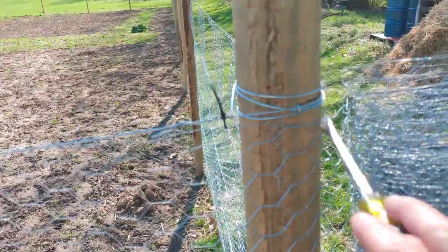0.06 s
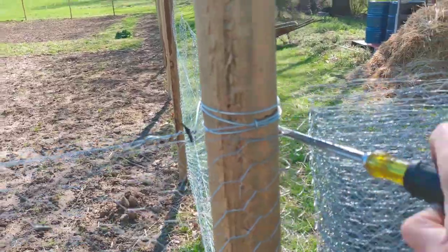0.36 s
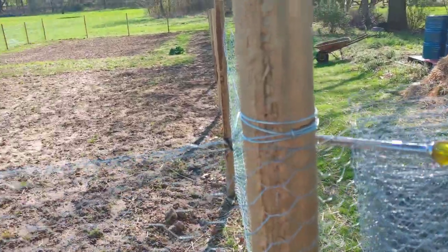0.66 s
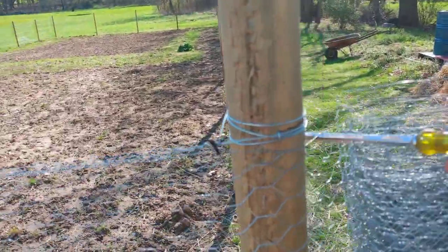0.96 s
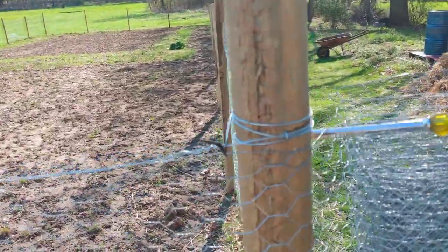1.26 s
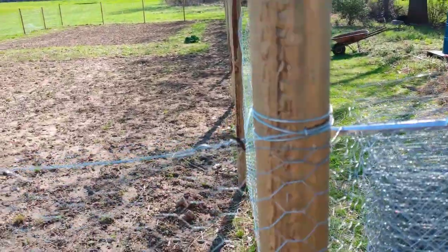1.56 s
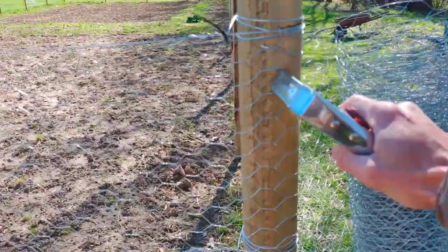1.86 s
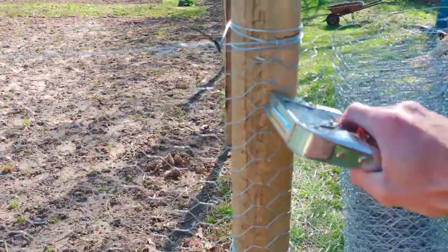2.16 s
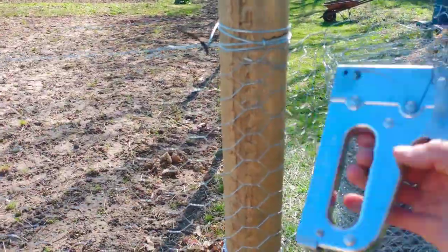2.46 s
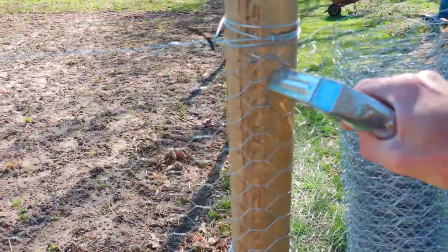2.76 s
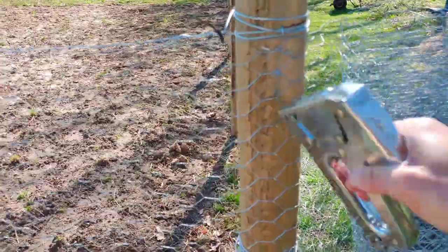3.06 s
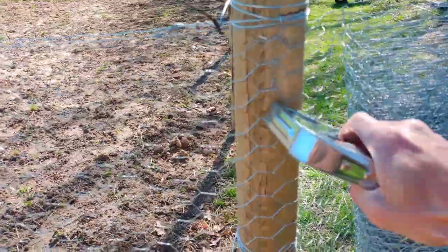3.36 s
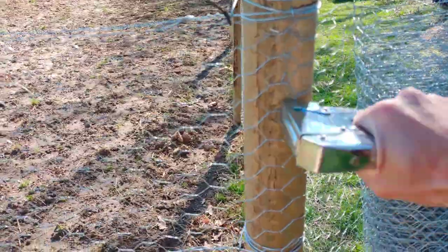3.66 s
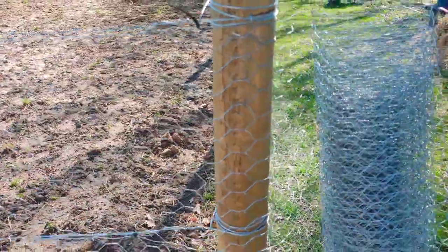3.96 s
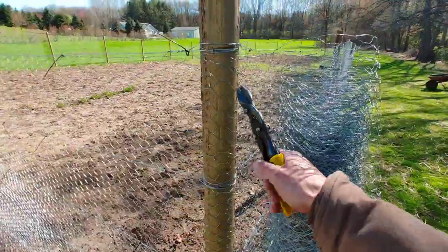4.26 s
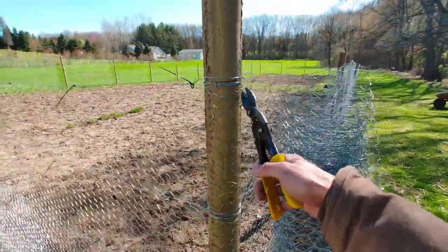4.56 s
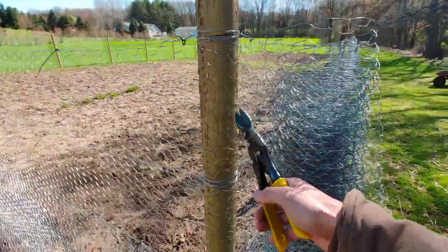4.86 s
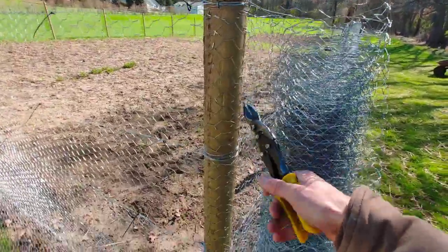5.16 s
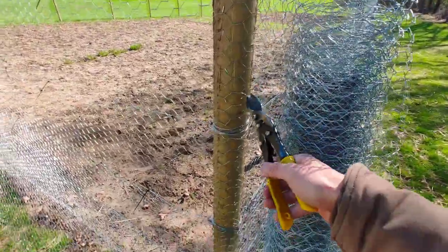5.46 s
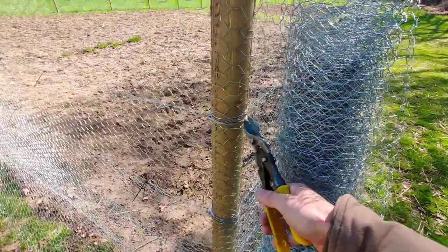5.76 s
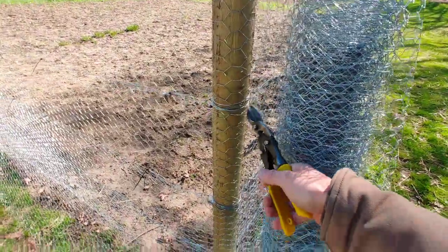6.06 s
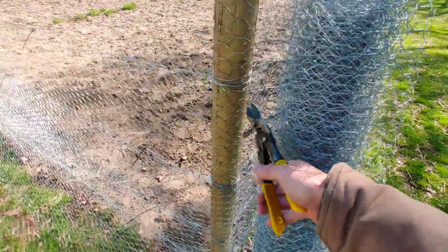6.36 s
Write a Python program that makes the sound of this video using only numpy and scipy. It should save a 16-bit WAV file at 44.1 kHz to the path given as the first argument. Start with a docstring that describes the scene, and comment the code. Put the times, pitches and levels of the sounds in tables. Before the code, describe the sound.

Wire mesh is fixed to a post outdoors, with the tools close to the microphone. For the first two seconds, uneven wind buffets the microphone with low rumbles and bumps, while wire ticks and scrapes lightly as it is twisted, with a sharper click at about 1.6 seconds. Small birds chirp faintly behind, growing sparser later. A staple gun fires with short metallic snaps at about 2.4, 3.0 and 3.8 seconds, with lighter handle clacks around them. The wind mostly dies down after 3 seconds. From about 4.2 seconds, soft mesh rustling and tiny steel squeaks lead into hand snips cutting wire: about eight sharp, briefly ringing clicks at uneven intervals, loudest near 5.2, 5.4 and 6.5 seconds, with light wire ticks between them. One more low wind bump comes near 5.3 seconds. A very faint breeze continues underneath.

```python
"""Fencing a garden with wire mesh.

Tie wire is twisted round a post, a staple gun fires three times and is shifted about, then tin snips
bite through the mesh. Each contact is a metallic click, smeared into a short, symmetrical burst of
ringing noise. Wind buffets two microphones; small birds chirp over the faint air of the field."""
import sys
import numpy as np
from scipy import signal
from scipy.fft import rfft, irfft, next_fast_len
from scipy.io import wavfile
from scipy.ndimage import uniform_filter1d

SR = 44100
rng = np.random.default_rng(int(sys.argv[2]) if len(sys.argv) > 2 else 0)


def log_audio(samples):
    """Write samples as a 16-bit WAV file to the path given in sys.argv[1]."""
    # one column per channel
    frames = np.atleast_2d(samples).T
    # limit to full scale, then quantise
    limited = np.clip(frames, -1, 1)
    pcm = np.round(limited * 32767).astype(np.int16)
    wavfile.write(sys.argv[1], SR, pcm)


N = 287487
TIME_S = np.arange(N) / SR

# Wire on post and tools. Each row: centre in seconds, level in dB, body, brightness and sizzle in dB
# relative to that level, strongest ring in Hz.
WIRE_TICKS = [(0.3074, -53.5, -18, -4.5, -21, 3800), (0.585, -46.5, 0, 2, -2, 4080),
              (0.736, -41.5, -10, -2, -12.5, 1420), (0.8983, -65.5, -11, 7.5, -28, 6000),
              (0.9787, -64, -8.5, 5, -23, 5520), (1.201, -64.5, 6, 10, -0.5, 6120),
              (1.314, -51, 10.5, -27, -31, 1260), (1.631, -31, -6.5, -2.5, -7, 3810),
              (1.9134, -52.5, 3, -8, -9, 1320), (1.9982, -42, -19, -10, -11, 2390),
              (4.171, -53.5, -9, -0.5, -4.5, 2920), (4.9737, -63, -4, 10, 6, 6100),
              (5.8972, -47.5, -5.5, -3, -8, 3560), (5.9294, -47.5, -17, -2, -3.5, 3540),
              (6.2693, -52, -16.5, -3, -8, 3860)]
# Staple shots. Each row: centre and half-width in seconds, level in dB, relative sizzle in dB.
STAPLE_SHOTS = [(2.3678, 0.0063, -23, -2.5), (3.0055, .0078, -29.5, -1.5), (3.7677, 0.0074, -26.5, -2)]
# Handle and nose clacks. Each row: centre in seconds, level in dB, relative brightness in dB, ring in Hz.
STAPLER_CLACKS = [(2.35, -40.5, -8, 2250), (2.594, -34.5, -1, 1290), (2.6287, -46.5, 0.5, 1180),
                  (2.667, -54.5, -3.5, 2170), (2.9045, -49.5, -6.5, 2330), (2.9641, -42.5, -9.5, 3050),
                  (3.0614, -54.5, 1, 4400), (3.121, -36.5, -0.5, 2014), (3.179, -50.5, -0.5, 2000),
                  (3.7047, -53, -14, 2220), (3.823, -50, -13.5, 4070), (3.8437, -38.5, 0, 2030)]
# Strands cut. Each row: as WIRE_TICKS, then relative ring height in dB.
SNIP_CUTS = [(4.4181, -41.5, -14.5, -7.5, -7.5, 1440, 4), (4.5864, -46, -21.5, -4.5, -7, 1610, 6),
             (4.8776, -29.5, -25, -11, -5.5, 2070, 9), (5.1861, -22.5, -16, -8.5, -7, 2300, 5.3),
             (5.4021, -24.5, -22.5, -3.5, -9.5, 2880, 9.5), (5.5953, -32, -12.5, -8, -11, 3160, 12.9),
             (6.0623, -35.5, -9.5, -6, -3.5, 1750, 4.8), (6.4888, -24, -15, -7.5, -9, 1990, 7)]
# Light, ringing wire ticks between and just after the snips. Each row: as STAPLER_CLACKS.
RINGING_TICKS = [(4.6177, -73, 7, 6080), (4.912, -58, -0.5, 4100), (5.3519, -58.5, -12.5, 3470),
                 (5.445, -49.5, 1, 3700), (5.627, -59, 4, 5600), (5.754, -61.5, -7, 3660),
                 (5.7777, -68.5, 0.5, 2900), (6.09, -59, -8, 3340)]
# Steel modes. Each row: frequency in Hz, width in Hz, height over the broad response in dB.
WIRE_MODES = [(880, 16, 13.5), (1422, 41, 7.5), (1766, 66, 2.5), (3030, 400, -12.5), (5500, 330, 4),
              (6440, 310, 1.5)]
STAPLER_MODES = [(826, 58, 4.4), (1114, 63, 9.9), (1827, 120, 6.8), (2034, 80, 7), (2740, 46, 3.8),
                 (3360, 82, 5), (4132, 200, 9.3), (5160, 110, 6.4), (5700, 120, 6.9), (6700, 99, 6.9),
                 (7920, 21, 5.2), (9300, 150, 4.9), (10400, 130, 2), (11650, 220, 3.1)]
SNIP_MODES = [(1473, 44, 10.9), (1717, 91, 3.7), (2265, 28, 2.2), (2150, 47, 1.7), (3103, 260, 1.4),
              (3970, 58, 2.2), (5290, 330, 2.7), (6250, 200, 2), (9140, 150, 5.6), (11700, 150, 2),
              (13300, 120, 4.16)]
# Steel slipping on steel. Each row: centre and half-width in seconds, pitch in Hz, level in dB.
SQUEAKS = [(0.421, 0.0072, 5750, -59), (2.43, 0.0064, 3484, -39), (2.454, .0036, 1480, -53),
           (2.762, 0.0041, 4420, -57.5), (4.208, 0.0075, 3050, -49.5), (4.218, 0.0074, 2694, -47.5),
           (4.333, 0.011, 2605, -55), (5.338, 0.0076, 2490, -60.5), (5.348, 0.0048, 3380, -49),
           (5.445, 0.0035, 3500, -42), (5.669, 0.0074, 3540, -58.5), (5.812, 0.0055, 4120, -53),
           (6.398, 0.0058, 3800, -61)]
# Mesh sliding on wood and tools. Each row: centre and half-width in seconds, level in dB.
SCRAPES = [(0.213, 0.032, -59.5), (0.87, 0.01, -66), (1.062, .008, -68), (1.236, 0.037, -65),
           (1.404, 0.016, -61), (2.205, 0.02, -67), (2.448, 0.0066, -62.5), (2.485, 0.0046, -71.5),
           (2.762, 0.0057, -67.5), (4.113, 0.0028, -64), (4.185, 0.03, -66), (4.376, 0.034, -66.5),
           (4.551, 0.011, -75), (6.455, 0.017, -72.5)]
# Shading between the microphones. Each row: frequency in Hz, left minus right in dB.
MIC_SHADING = [(400, 5), (900, 2.5), (1400, 6.5), (1900, -2), (2500, 3.5), (3100, 0), (3500, -1),
               (4300, -3), (5400, -9.5), (6400, -4.5), (7500, 6), (10000, 2.5), (14000, 7)]
# Wind pressure per microphone. Each row: time in seconds, relative level in dB.
WIND_LEFT = [(0.09, -99), (0.14, -39), (0.39, -44), (0.45, -28.5), (0.56, -35.5), (0.73, -27), (1.0, -22.5),
             (1.32, -28), (1.67, -20.5), (1.88, -35), (1.98, -59), (2.05, -48), (2.35, -53.5),
             (2.44, -70.5), (2.49, -36), (2.65, -43), (2.9, -32.5), (3.06, -63), (3.7, -67), (3.85, -74.5)]
WIND_RIGHT = [(0.04, -70), (0.14, -46.5), (0.3, -47.5), (0.4, -59), (0.73, -33.5), (0.84, -44.5),
              (0.98, -25.5), (1.09, -46), (1.381, -26), (1.519, -43), (1.661, -30.5), (2.1, -52),
              (2.33, -39), (2.441, -66.5), (2.56, -42.5), (2.719, -54.5), (2.971, -34), (3.05, -54.5),
              (3.5, -69), (3.851, -79)]
# Lone eddies. Each row: centre and half-width in seconds, level and left minus right in dB, pitch in Hz.
PUFFS = [(0.259, 0.0044, -29.5, 14, 272), (0.617, 0.0047, -20, 31, 205), (0.744, .012, -18, 12, 148.4),
         (0.834, 0.0052, -17, 34, 155), (0.889, 0.0042, -14, 24, 198), (0.968, 0.0048, -17, 9.5, 278),
         (1.04, 0.0044, -28, 22, 363), (1.247, 0.0098, -20, 19, 245), (1.657, 0.023, -25, 25, 299),
         (1.902, 0.01, -24.5, 14, 148), (1.988, 0.0078, -26.5, -36, 138.5), (2.312, 0.013, -20, -45, 167),
         (2.9, 0.018, -28, 11, 134), (3.098, 0.0062, -34.5, -31, 124), (3.268, 0.0068, -34.5, -21, 128),
         (3.662, 0.047, -58, 8, 209), (4.26, 0.041, -59, 10, 109), (4.4, 0.0043, -49.5, 15, 137),
         (5.298, 0.0071, -29.5, 41, 208), (5.396, 0.01, -49, 8, 172)]
# Raspy and clear bird notes. Each row: centre and length in seconds, mid-note pitch in Hz, level in dB.
CHIRPS = [(0.04, 0.06, 3090, -65.5), (0.335, 0.052, 4100, -56.5), (0.445, 0.04, 3930, -50.5),
          (0.762, 0.039, 4100, -52), (1.026, 0.039, 4120, -56.5), (1.084, 0.042, 3730, -61),
          (1.282, .1, 2810, -68.5), (1.415, 0.044, 4140, -48), (1.847, 0.037, 4080, -52.5),
          (2.039, 0.033, 2560, -54), (2.09, 0.04, 2840, -53.5), (2.215, 0.045, 2624, -55),
          (3.342, 0.059, 2570, -71.5), (3.487, 0.04, 2840, -64.5), (3.661, 0.031, 2590, -56)]
WHISTLES = [(0.1, .027, 2560, -65), (1.468, 0.085, 2710, -62), (1.692, .039, 2875, -52),
            (2.235, .04, 2350, -55), (3.368, .043, 2360, -72), (3.529, 0.04, 2975, -63),
            (3.69, 0.084, 2355, -62), (4.454, 0.025, 2545, -65.5), (5.085, .022, 2380, -66),
            (5.11, 0.022, 2790, -68.5), (6.205, .03, 2650, -73)]
# Air of the field. Each row: time in seconds, relative mid and treble levels in dB.
AIR_LEVELS = [(0.0, -78, -85.5), (0.4, -73, -78), (0.56, -75, -79), (0.91, -75.5, -86.5), (1.69, -75, -84),
              (2.27, -72, -80), (2.7, -82, -86), (3.1, -80, -92.5), (3.43, -80, -87), (4.34, -79.5, -87),
              (4.65, -84.5, -83.5), (5.77, -79.5, -83.5), (6.21, -83, -84.5), (6.52, -84.5, -79)]
# Brief level dips. Each row: centre and half-width in seconds.
DIPS = [(1.941, 0.013), (4.147, 0.016)]
# Source spectra. Each row: frequency in Hz, relative gain in dB.
STEEL_EQ = [(60, -13), (200, -7.5), (450, -0.5), (700, -5), (1100, -3.5), (1500, 0.5), (3200, 2.5),
            (4500, -2.5), (6700, -3), (7700, -7), (10500, -2.5), (16000, -9.5)]
SCRAPE_EQ = [(500, 7), (1500, 0.5), (3500, 0), (6700, -0.5), (7800, -20), (12000, -12.5), (16000, -11)]
RUSTLE_EQ = [(1500, -4.5), (3500, -1.5), (6700, 0), (7800, -12), (10000, -2), (13000, -1), (16000, -1)]
GENTLE_WIND_EQ = [(20, -19.5), (40, -15), (65, -4), (120, 5), (180, -1.5), (250, -9.5), (330, -26),
                  (450, -43), (700, -53.5), (2000, -84.5)]
HARD_WIND_EQ = [(100, -30.5), (220, -3), (300, 10.5), (380, -0.5), (460, -11), (580, -24), (750, -38.5),
                (1100, -39), (3000, -72.5)]
FAR_RUMBLE_EQ = [(20, 1), (80, 4.5), (130, 4.5), (280, 3), (450, -3), (800, -8.5), (1500, -38)]
TREES_EQ = [(400, -16.5), (800, 3.5), (1400, -4), (3000, -4.5), (4500, -10.5), (7000, -22.5)]
GRASS_EQ = [(2500, -5.5), (4500, 3.5), (6700, 4.5), (7800, -14.5), (10000, 3.5), (13000, 1), (16000, -7)]


def staple_gun(rebound_s, rebound_db):
    """A spring drives each staple home, the striker rebounds once, duller; handle and nose clack."""
    shots = [contact(s, half_s, db, body_db=-11, bright_db=-2, sizzle_db=sizzle_db,
                     ring_hz=2530, height_db=7, pan_db=-1)
             for s, half_s, db, sizzle_db in STAPLE_SHOTS]
    rebounds = [contact(s + rebound_s, half_s=0.0058, db=db + rebound_db, body_db=-22, bright_db=-2,
                        sizzle_db=-9, ring_hz=2530, height_db=7, pan_db=-1)
                for s, _, db, _ in STAPLE_SHOTS]
    clacks = [contact(s, half_s=0.0059, db=db, body_db=-27, bright_db=bright_db,
                      sizzle_db=bright_db - 1, ring_hz=hz, height_db=11, pan_db=-1)
              for s, db, bright_db, hz in STAPLER_CLACKS]
    return struck_steel(shots + rebounds + clacks, STAPLER_MODES, body_hz=1050, ring_trim_db=0.5,
                        ring_width_hz=280, tail_db=-18.5, tail_t60_s=0.09, grain_db=0.85)


def snips(cut_half_s, tick_half_s):
    """Blades bite through strands; light, ringing wire ticks fall between and just after cuts."""
    cuts = [contact(s, cut_half_s, *tone, pan_db=-2) for s, *tone in SNIP_CUTS]
    ticks = [contact(s, tick_half_s, db, body_db=-24, bright_db=bright_db,
                     sizzle_db=bright_db - 9, ring_hz=hz, height_db=21, pan_db=-2)
             for s, db, bright_db, hz in RINGING_TICKS]
    return struck_steel(cuts + ticks, SNIP_MODES, body_hz=1100, ring_trim_db=-1.5,
                        ring_width_hz=230, tail_db=-10, tail_t60_s=0.061, grain_db=2)


def wire(tick_half_s, stray_half_s, stray_count):
    """Wire slips on post and blades; loose strands touch at random, harder in livelier air."""
    ticks = [contact(s, tick_half_s, *tone, height_db=10.5, pan_db=-1.5) for s, *tone in WIRE_TICKS]
    for s, force, pitch in rng.random((stray_count, 3)) * [N / SR, 1, 1]:
        db = air_treble_db(s) + 3 + 7.5 * force
        ticks.append(contact(s, stray_half_s, db, body_db=-13, bright_db=-1, sizzle_db=-8,
                             ring_hz=2600 + 3000 * pitch, height_db=16, pan_db=-2))
    return struck_steel(ticks, WIRE_MODES, body_hz=1120, ring_trim_db=-1,
                        ring_width_hz=490, tail_db=-12, tail_t60_s=0.09, grain_db=1.15)


def contact(s, half_s, db, body_db, bright_db, sizzle_db, ring_hz, height_db, pan_db):
    """One contact, with levels for four registers: body, main ring, brightness, sizzle."""
    register_db = db + np.array([body_db, 0, bright_db, sizzle_db])
    return s, half_s, register_db, ring_hz, height_db, pan_db


def struck_steel(contacts, modes, body_hz, ring_trim_db, ring_width_hz, tail_db, tail_t60_s, grain_db):
    """Metallic clicks, each smeared into a short, symmetrical burst of ringing noise; faint tail."""
    out, t = np.zeros((2, N)), centred_s(8192)
    hz = bins_hz(t)
    register = np.searchsorted([body_hz, 4200, 7500], hz)
    mode_power = sum((undb(db) * resonance(hz, mode_hz, width_hz)) ** 2 for mode_hz, width_hz, db in modes)
    steel = eq_gain(hz, STEEL_EQ) * np.sqrt(1 + mode_power)
    shade_db = 20 * np.log10(eq_gain(hz, MIC_SHADING))
    for s, half_s, register_db, ring_hz, height_db, pan_db in contacts:
        white, grain = rng.standard_normal((2, 2, len(t)))
        # the strike point picks the dominant mode
        ring = np.hypot(1, undb(height_db + ring_trim_db) * resonance(hz, ring_hz, ring_width_hz) ** 2)
        ringing = irfft(rfft(white) * steel * ring * pan(shade_db + pan_db))
        roughness = undb(grain_db * unit(uniform_filter1d(grain, size=64)))
        swell = arch(t, half_s)
        spectrum = rfft(ringing * roughness * np.hypot(swell, tail(t, tail_db, tail_t60_s)))
        # force and sharpness set each register's energy above 450 Hz
        power = np.sum(np.abs(spectrum) ** 2, axis=0) * (hz > 450)
        energy = np.bincount(register, power) * 2 / len(t)
        gain = undb(register_db) * np.sqrt(np.sum(swell ** 2) / energy)
        add(out, s, irfft(spectrum * uniform_filter1d(gain[register], size=40)))
    return out


def squeaks(width_hz, octave_db):
    """Steel slips on steel: a brief rough tone plus its octave."""
    out, t = np.zeros((2, N)), centred_s(4096)
    hz = bins_hz(t)
    for s, half_s, pitch_hz, db in SQUEAKS:
        swell = arch(t, half_s)
        lines = band(hz, pitch_hz, width_hz) + undb(octave_db) * band(hz, 2 * pitch_hz, 2 * width_hz)
        slip = shaped_noise(t, lines) * swell
        add(out, s, unit(slip) * rms(swell) / np.sqrt(2) * undb(db))
    return out


def scrapes(grain_db):
    """Mesh dragged over the post catches and hisses unevenly."""
    pressure = sum(undb(db) * bell(TIME_S - s, half_s) for s, half_s, db in SCRAPES)
    catches = np.repeat(rng.standard_normal(N // 256 + 1), 256)[:N]
    return noise(SCRAPE_EQ) * pressure * undb(grain_db * uniform_filter1d(catches, size=200))


def rustle(trim_db, spread_db, rate_hz):
    """Loose mesh stirs in an uneven fizz, stronger in livelier air."""
    return noise(RUSTLE_EQ) * undb(air_treble_db(TIME_S) + trim_db + spread_db * wander(rate_hz)[0])


def wind(trim_db, buffet_db, buffet_hz):
    """Separate turbulence at each microphone; harder gusts shed smaller, higher eddies."""
    gust_db = np.array([np.interp(TIME_S, *np.transpose(side), right=-120)
                        for side in (WIND_LEFT, WIND_RIGHT)])
    gust_db += buffet_db * wander(buffet_hz)
    eddy_db = -8 + 0.86 * (gust_db + 20)
    air = noise(GENTLE_WIND_EQ) + undb(eddy_db) * noise(HARD_WIND_EQ)
    # levelled, so the gust alone sets the pressure
    power = uniform_filter1d(uniform_filter1d(air ** 2, size=1200), size=1200)
    return air / np.sqrt(power + 1e-9) * undb(gust_db + trim_db)


def puffs(width_ratio):
    """Lone eddies hit the microphones as low bumps."""
    out, t = np.zeros((2, N)), centred_s(16384)
    for s, half_s, db, pan_db, hz in PUFFS:
        swell = bell(t, half_s)
        bump = shaped_noise(t, band(bins_hz(t), hz, width_ratio * hz)) * swell
        add(out, s, unit(bump) * rms(swell) * undb(db) * pan(pan_db))
    return out


def birds(echo_db, echo_t60_s, warble_hz, warble_per_rasp):
    """Raspy falling chirps and cleaner, near-level whistles, with a faint echo from the trees."""
    out, t = np.zeros((2, N)), centred_s(16384)
    hz = bins_hz(t)
    # fall and rasp are fractions of the pitch
    for notes, fall, rasp in (CHIRPS, 0.15, 0.12), (WHISTLES, 0.033, 0.03):
        for s, length_s, mid_hz, db in notes:
            start_hz, end_hz = mid_hz * (1 + fall / 2), mid_hz * (1 - fall / 2)
            glide_hz = np.interp(t, [-length_s / 2, length_s / 2], [start_hz, end_hz])
            # a rough syrinx wobbles the pitch and spreads the line into a band
            warble = unit(shaped_noise(t, band(hz, warble_hz, warble_hz / 2)))
            phase = 2 * np.pi * np.cumsum(glide_hz * (1 + warble_per_rasp * rasp * warble), axis=-1) / SR
            spread = bell(hz, rasp * start_hz / 2)
            tone = shaped_noise(t, spread) * np.sin(phase) + shaped_noise(t, spread) * np.cos(phase)
            swell = bell(t, length_s / 3.6)
            envelope = np.hypot(swell, tail(t, echo_db, echo_t60_s))
            add(out, s, unit(tone * envelope) * rms(swell) * undb(db))
    return out


def field(rumble_trim_db, trees_trim_db, grass_trim_db):
    """Breeze in trees and dry grass; a far rumble swells with the trees."""
    s, mid_db, _ = np.transpose(AIR_LEVELS)
    breeze_db = np.interp(TIME_S, s, mid_db)
    rumble = noise(FAR_RUMBLE_EQ) * undb(breeze_db + rumble_trim_db)
    trees = noise(TREES_EQ) * undb(breeze_db + trees_trim_db)
    grass = noise(GRASS_EQ) * undb(air_treble_db(TIME_S) + grass_trim_db)
    return rumble + trees + grass


def air_treble_db(at_s):
    """Liveliness of the air: its relative treble level."""
    s, _, treble_db = np.transpose(AIR_LEVELS)
    return np.interp(at_s, s, treble_db)


def undb(db):
    return 10 ** (np.asarray(db) / 20)


def rms(x):
    return np.sqrt(np.mean(x ** 2, axis=-1, keepdims=True) + 1e-30)


def unit(x):
    return x / rms(x)


def centred_s(size):
    return (np.arange(size) - size // 2) / SR


def bins_hz(x):
    return np.maximum(np.fft.rfftfreq(x.shape[-1], 1 / SR), 1)


def eq_gain(hz, eq):
    """Gain of a (Hz, dB) outline."""
    points_hz, db = np.transpose(eq)
    return undb(np.interp(np.log(hz), np.log(points_hz), db))


def resonance(hz, centre_hz, width_hz):
    """Gain of one mode, 1 at centre."""
    return 1 / np.sqrt(1 + (2 * (hz - centre_hz) / width_hz) ** 2)


def band(hz, centre_hz, width_hz):
    """Gaussian band gain."""
    return bell(hz - centre_hz, width_hz / 2)


def bell(x, half_width):
    """Gaussian; half_width is the standard deviation of its square."""
    return np.exp(-(x / (2 * half_width)) ** 2)


def arch(t, half_s):
    """Raised cosine, about as wide as bell."""
    return np.cos(np.pi / 2 * np.clip(t / (3.6 * half_s), -1, 1)) ** 2


def tail(t, db, t60_s):
    """Exponential decay from t = 0."""
    return undb(db - 60 * np.abs(t) / t60_s) * (t > 0)


def shaped_noise(t, gain):
    """Independent left and right noise as long as t, with a gain per bin."""
    return irfft(rfft(rng.standard_normal((2, len(t)))) * gain, len(t))


def noise(eq):
    """Full-length stereo noise, rms 1."""
    t = centred_s(next_fast_len(N))
    return unit(shaped_noise(t, eq_gain(bins_hz(t), eq))[:, :N])


def wander(rate_hz):
    """Slow random drift per channel, rms 1."""
    return noise([(rate_hz, 0), (2 * rate_hz, -20), (4 * rate_hz, -120)])


def pan(db):
    """Constant-power gains for a left minus right level."""
    gains = np.array([undb(db / 2), undb(-db / 2)]).reshape(2, -1)
    return gains / np.sqrt(np.sum(gains ** 2, axis=0))


def add(out, centre_s, x):
    """Mix x into out, centred on centre_s."""
    start = int(round(centre_s * SR)) - x.shape[-1] // 2
    a, b = max(start, 0), min(start + x.shape[-1], N)
    out[:, a:b] += x[:, a - start:b - start]


def scene():
    """Wire and tools close by, wind on the microphones, birds and field behind."""
    mix = wire(tick_half_s=0.0061, stray_half_s=0.004, stray_count=36)
    mix += staple_gun(rebound_s=0.025, rebound_db=-21)
    mix += snips(cut_half_s=0.005, tick_half_s=0.006)
    mix += squeaks(width_hz=100, octave_db=-32)
    mix += scrapes(grain_db=3.5)
    mix += rustle(trim_db=-5.5, spread_db=6.5, rate_hz=25)
    mix += wind(trim_db=1, buffet_db=3, buffet_hz=14)
    mix += puffs(width_ratio=0.61)
    mix += birds(echo_db=-23, echo_t60_s=0.18, warble_hz=55, warble_per_rasp=0.35)
    return mix + field(rumble_trim_db=11.5, trees_trim_db=3.5, grass_trim_db=-2.5)


def record(dry):
    """The level dips briefly twice; the camera cuts the top steeply."""
    dips = np.prod([1 - 0.92 * np.exp(-((TIME_S - s) / half_s) ** 4) for s, half_s in DIPS], axis=0)
    lowpass = signal.ellip(N=10, rp=0.2, rs=80, Wn=16050, fs=SR, output="sos")
    return signal.sosfilt(lowpass, dry * dips)


dry = scene()
out = record(dry)
log_audio(out)
```